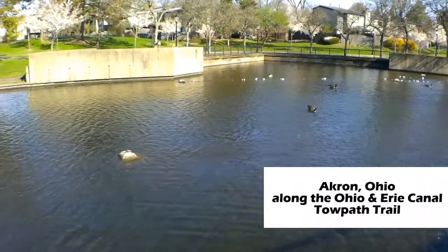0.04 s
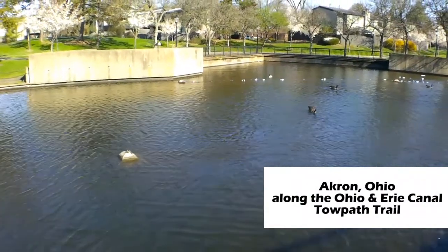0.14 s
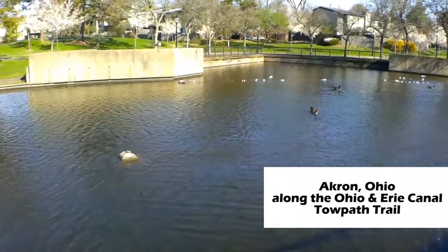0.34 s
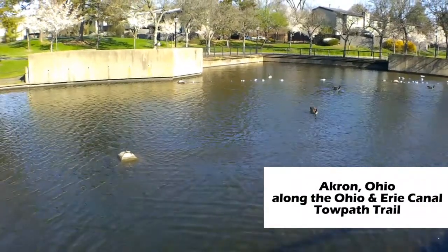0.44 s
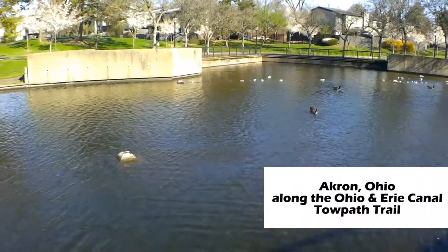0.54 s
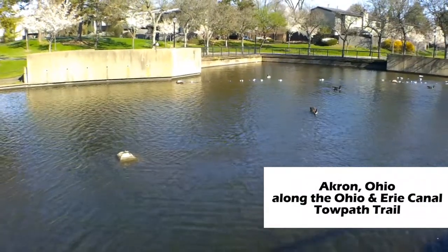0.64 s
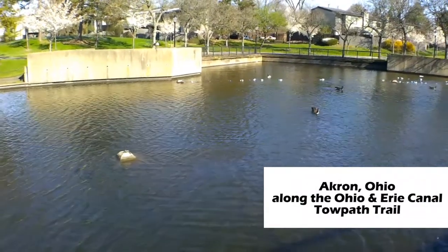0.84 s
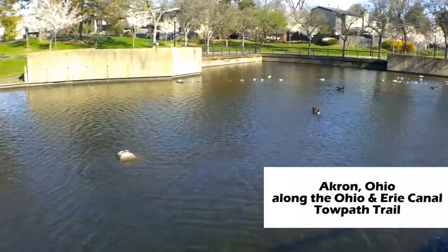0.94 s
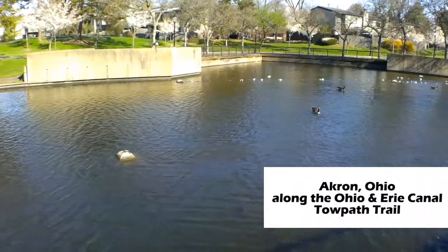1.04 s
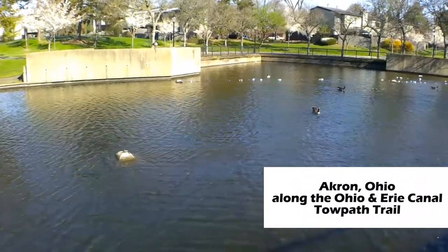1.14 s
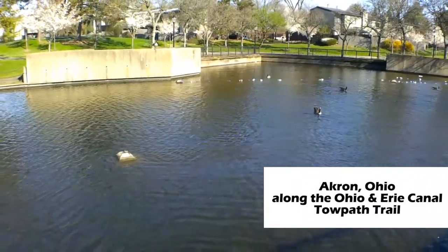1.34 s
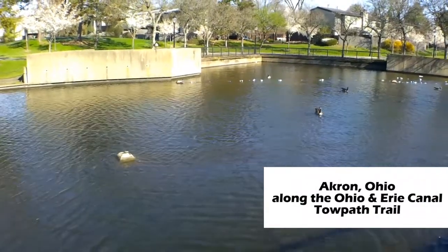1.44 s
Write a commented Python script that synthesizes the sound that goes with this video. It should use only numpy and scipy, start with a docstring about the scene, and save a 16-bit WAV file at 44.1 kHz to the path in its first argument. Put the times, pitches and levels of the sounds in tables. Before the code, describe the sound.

Two geese trade calls on a walled pond: short rising honks with a croaky start, and low rough grunts breaking into falling clucks. Walls echo them; a brief bird whistle and faint distant clamour sit behind.

```python
"""A walled pond with two geese calling: one honks on a clear rising note, the other grunts low and
breaks into a falling cluck. Both are sums of partials with moving pitch, level and roughness.
Walls return late echoes, banks and trees a diffuse tail (noise convolution). A far goose holds a thin
note (one partial), a songbird whistles (gliding sines); far clamour and wind (coloured noise) fill the gaps."""
import sys
import numpy as np
from scipy import signal
from scipy.fft import rfft, irfft, next_fast_len
from scipy.io import wavfile
from scipy.ndimage import uniform_filter1d, map_coordinates

SR = 44100
rng = np.random.default_rng(int(sys.argv[2]) if len(sys.argv) > 2 else 0)


def generate_wav(signal):
    """Clip the signal to [-1, 1] and save it as 16-bit WAV at the path in sys.argv[1]."""
    frames = np.transpose(np.atleast_2d(signal))
    scaled = np.clip(frames, -1, 1) * 32767
    pcm = np.round(scaled).astype(np.int16)
    wavfile.write(sys.argv[1], SR, pcm)


def magnitude_from_level(level_db):
    """Linear magnitude for a level in decibels (20 dB per decade)."""
    exponent = np.asarray(level_db, float) / 20
    return 10 ** exponent


N = 66150  # samples


def unit(x):
    """Scale to rms 1."""
    return x / np.sqrt(np.mean(x ** 2) + 1e-20)


def along(points, hz):
    """Interpolate (f/Hz, value) points on a log frequency axis."""
    f, v = np.transpose(points)
    return np.interp(np.log(hz + 1), np.log(f + 1), v)


def coloured(x, points):
    """Filter x by a (f/Hz, gain/dB) curve."""
    m = next_fast_len(len(x) + 8192)
    gain = magnitude_from_level(along(points, np.fft.rfftfreq(m, 1 / SR)))
    return irfft(rfft(x, m) * gain, m)[:len(x)]


def wobble(n, rate_hz):
    """Smooth random curve through rate_hz normal knots per second."""
    knots = rng.standard_normal(int(n * rate_hz / SR) + 4)
    return map_coordinates(knots, [np.arange(n) * rate_hz / SR])


# noise colours of clamour, hiss and wind rumble: [f/Hz, gain/dB]
CLAMOUR_COLOUR = [(88, -26), (150, -18), (499, -4), (559, -3.5), (723, -5), (782, -5.5), (856, -4),
                  (1110, -6), (1390, -4.5), (2200, -36), (2860, -76), (4840, -120)]
HISS_COLOUR = [(1060, -24), (1800, -3), (2220, -4.5), (3150, -11.5), (3540, -9.5), (4200, -12.5),
               (15600, -12.5)]
RUMBLE_COLOUR = [(12, -20), (20, 4.5), (41, -3.5), (81, -7), (124, -14), (200, -21), (260, -32),
                 (440, -120)]
# far clamour: [t/s, level/dB]
CLAMOUR_LEVEL = [(0, -45), (.15, -44), (0.301, -46), (.5, -42.5), (.7, -45.5), (.8, -43), (.83, -56),
                 (.9, -43.5), (1.15, -43.5), (1.25, -46), (1.4, -45.5), (1.5, -46)]


def background():
    """Far traffic and calls blurred to noise, hiss, and a wavering low rumble of wind."""
    clamour_db = np.interp(np.arange(N) / SR, *np.transpose(CLAMOUR_LEVEL))
    hiss_db = -57.5 + 0.59 * wobble(N, 4)
    rumble_db = -47 + 0.27 * wobble(N, 8.5)
    layers = [(CLAMOUR_COLOUR, clamour_db), (HISS_COLOUR, hiss_db), (RUMBLE_COLOUR, rumble_db)]
    return sum(magnitude_from_level(db) * unit(coloured(rng.standard_normal(N), colour)) for colour, db in layers)


# absorption of banks and walls: [f/Hz, gain/dB]
ECHO_COLOUR = [(300, 3), (450, -18), (850, -9), (1250, -3), (2000, -0.5), (3500, -0.5), (5000, -10.5),
               (9000, -5)]


def pond(x):
    """Diffuse tail off banks and trees: decaying noise with a soft onset."""
    t60_s, gain_db, onset_s = .35, -14, 0.017
    t = np.arange(SR) / SR
    tail = rng.standard_normal(SR) * magnitude_from_level(-60 * t / t60_s) * np.minimum(1, t / onset_s)
    wet = signal.fftconvolve(x, tail / np.linalg.norm(tail))[:N]
    return magnitude_from_level(gain_db) * coloured(wet, ECHO_COLOUR)


def echoes(x, walls):
    """Each wall returns one sharp copy with a short scattered tail."""
    scatter_db = -7  # tail re sharp copy
    t = np.arange(SR // 2) / SR
    path = np.zeros(len(t))
    for delay_s, db, smear_s in walls:
        decay = (t > delay_s) * np.exp(-np.maximum(t - delay_s, 0) / smear_s)
        tail = decay * rng.standard_normal(len(t))
        path += magnitude_from_level(db + scatter_db) * tail / np.linalg.norm(tail)
        path[round(delay_s * SR)] += magnitude_from_level(db)
    return coloured(signal.fftconvolve(x, path)[:N], ECHO_COLOUR)


# songbird glides: [start t/s, end t/s, start f/Hz, end f/Hz, peak level before trim and flutter/dB]
BIRD_NOTES = [(0.372, 0.383, 5320, 4840, -46.5), (0.384, 0.42, 4944, 4720, -38),
              (0.425, .431, 4550, 6480, -39.5), (0.428, 0.45, 6400, 6580, -50),
              (0.445, 0.466, 6900, 9000, -50), (0.468, 0.485, 5350, 4950, -36.5),
              (0.483, 0.496, 4960, 4930, -57), (0.499, 0.513, 4910, 4730, -39),
              (0.517, 0.518, 4500, 7000, -39), (0.52, 0.535, 6370, 6500, -51),
              (0.538, 0.555, 6600, 9100, -52.5), (0.554, 0.568, 4920, 4750, -42),
              (0.567, 0.594, 4730, 4810, -43.5), (.592, 0.612, 4720, 4640, -50),
              (0.603, .613, 6500, 9360, -50.5)]


def songbird():
    """Gliding whistles with fluttering level, doubled by a near reflection."""
    edge_s, trim_db, flutter_db = .002, -0.5, 1.5
    reflection_s, reflection_db = .0035, -9
    t, out = np.arange(N) / SR, np.zeros(N)
    for start, end, from_hz, to_hz, db in BIRD_NOTES:
        glide_hz = np.interp(t, [start, end], [from_hz, to_hz])
        gate = np.clip(np.minimum(t - start, end - t) / edge_s + .5, 0, 1)
        level = magnitude_from_level(db + trim_db + flutter_db * wobble(N, 121.2))
        out += level * gate * np.sin(2 * np.pi * np.cumsum(glide_hz) / SR)
    return out + magnitude_from_level(reflection_db) * np.roll(out, round(reflection_s * SR))


DRIFT_DB, DRIFT_RATE_HZ, DRIFT_FROM_HZ = 2.5, 35, 2300  # treble partials swell and sink one by one
MOST_SHAKE = .9  # cap on shake depth: the treble keeps its pulses


def voice(rows, partials, rough, count, gate=0):
    """One call as a sum of shaken partials; partials(k, Hz, time, columns) gives their rms dB."""
    s, *cols = np.transpose(rows)
    i = np.arange(max(round(s[0] * SR), 0), min(round(s[-1] * SR), N))
    pitch_hz, *rest = [np.interp(i / SR, s, c) for c in cols]
    k = np.arange(1, count + 1)[:, None]
    hz = k * pitch_hz
    treble = hz > DRIFT_FROM_HZ

    jitter = np.min(rough) * 0.039 * wobble(len(i), 141.7)
    phase = 2 * np.pi * np.cumsum(pitch_hz * (1 + jitter)) / SR

    level = magnitude_from_level(partials(k, hz, i / SR - s[0], *rest)) * (hz < 15000)
    drift = np.array([wobble(len(i), DRIFT_RATE_HZ) for _ in k])
    level = level * magnitude_from_level(DRIFT_DB * treble * drift)
    burst = np.exp(gate * np.cos(phase)) / np.sqrt(np.i0(2 * gate))  # rms 1 over a pulse
    level = level * np.where(treble, burst, 1)

    # random size and phase slip of each partial, deeper with frequency
    knots = rng.standard_normal((2, count, len(i) // 96 + 2))[:, :, np.arange(len(i)) // 96]
    depth = np.minimum(rough * (hz / 1000) ** 1.4, MOST_SHAKE)
    size, slip = depth * uniform_filter1d(knots, size=96, axis=2)
    level = level * (1 + size) / np.sqrt(1 + depth ** 2)
    tone = np.sum(level * np.sin(k * phase - 0.0046 * k * k + slip), axis=0)

    # 3.5 ms fades, none where the call meets either end of the scene
    fade_in = i - i[0] + (i[0] == 0) * SR
    fade_out = i[-1] - i + (i[-1] == N - 1) * SR
    edge = np.minimum(1, np.minimum(fade_in, fade_out) / (0.0035 * SR))
    out = np.zeros(N)
    out[i] = np.sqrt(2) * tone * edge
    return out


FAR_ROUGH = .2  # shake at 1 kHz, far goose and fading honk
# far goose, one list a note: [t/s, f/Hz, level/dB]
FAR_NOTES = [
    [(0.3, 1389, -64), (0.314, 1413, -65), (0.32, 1387, -58), (0.346, 1300, -60), (0.38, 1291, -68)],
    [(0.69, 1357, -31), (0.718, 1286, -53), (0.752, 1386, -39), (0.798, 1331, -36), (0.82, 1329, -68)],
    [(1.37, 1343, -53), (1.418, 1359, -62), (1.43, 1287, -82), (1.454, 1373, -65), (1.48, 1338, -31)],
]


def far_goose():
    """One wavering partial is all that carries from across the water."""
    def partials(k, hz, t, db):
        return db + 0 * hz
    return sum(voice(rows, partials, FAR_ROUGH, count=1) for rows in FAR_NOTES)


# echoes of a honk just gone: [t/s, pitch f/Hz, 2nd partial level/dB, 3rd partial level/dB, treble re 2nd/dB]
FADING_HONK = [(0.0, 420, -46.5, -26.5, -5), (0.01, 402, -36.5, -36.5, -25),
               (0.042, 412.5, -38, -36, -19.5), (0.064, 404, -47, -37.5, -17),
               (0.074, 403.7, -51.5, -49, -15.5), (0.108, 410.8, -42, -46, -23.5),
               (0.138, 400.6, -55, -56, -24), (0.16, 413, -43, -35.5, -29)]


def fading_honk():
    """Remains of a honk just gone: weak, rough honk partials with the croak suppressed."""
    return honk(FADING_HONK, -120, FAR_ROUGH)


# partials 1-14 before and after the break: [level re call/dB]; the 4th follows its own column instead
GRUNT = [-33.5, -65, -27.5, 0, -21.5, -17, -10, 0, -59, -14.5, -24, -37.5, -48, -31]
BREAK = [-80, -31.5, -17.5, 0, -62, -63, 4.5, 1, -60, -18, -20.5, -14.5, -45, -23.5]
# partials above the 14th: [f/Hz, level re call/dB]
CLUCK_TREBLE = [(2400, -39), (2800, -46), (3500, -34.5), (4200, -38.5), (4800, -44), (5500, -38.5),
                (6300, -45), (7200, -55.5), (8000, -52), (8800, -53), (9800, -63.5), (11000, -53),
                (12500, -74)]
BREAK_FROM_DB, BREAK_SPAN_DB = -13, 12.5  # 4th partial re call at break onset; rise to full break
EVERY_FOURTH_DB, GRUNT_DULL_DB = 15.5, -20.5  # treble: boost of every 4th partial; cut before the break
CLUCK_ROUGH, FOURTHS_STEADY = .15, .5  # shake at 1 kHz; its factor for every 4th partial
CLUCK_GATE = 1.3  # treble comes in one burst a pulse


def cluck(rows):
    """Slow pulses; at the break the 4th and 7th partials and the treble jump up."""
    def partials(k, hz, t, level, fourth, treble):
        broke = np.clip((fourth - level - BREAK_FROM_DB) / BREAK_SPAN_DB, 0, 1)
        row = np.minimum(k, len(GRUNT)) - 1
        low = np.array(GRUNT)[row] * (1 - broke) + np.array(BREAK)[row] * broke
        high = treble + along(CLUCK_TREBLE, hz)
        high = high + EVERY_FOURTH_DB * (k % 4 == 0) + GRUNT_DULL_DB * (1 - broke)
        return np.where(k == 4, fourth, level + np.where(k <= len(GRUNT), low, high))
    k = np.arange(1, 73)[:, None]
    rough = CLUCK_ROUGH * np.where(k % 4, 1, FOURTHS_STEADY)
    return voice(rows, partials, rough, count=72, gate=CLUCK_GATE)


# clucks, one list a call: [t/s, pulse rate f/Hz, level/dB, 4th partial level/dB, treble trim/dB]
CLUCKS = [
    [(0.14, 148, -68, -46, -8), (0.148, 143.9, -60, -61, -7), (0.162, 150.8, -39.5, -54, -3),
     (0.19, 149.8, -29.5, -44, 8), (0.194, 148.9, -30, -41, -3), (0.204, 175.8, -31.5, -30.5, -12),
     (0.214, 163.1, -24.5, -27.5, -1), (0.236, 156.8, -30.5, -37, -6), (0.255, 155, -50, -48, 7)],
    [(0.585, 155.6, -36, -27.5, 3), (0.599, 149.1, -33, -65, 12), (0.621, 152, -23.5, -43.5, -3),
     (0.631, 172.4, -32, -25.5, 0), (0.639, 173.1, -25, -28.5, 5), (0.663, 165.6, -28, -33, -5),
     (0.685, 159, -50.5, -39, 0)],
    [(1.255, 155, -46, -41, -18), (1.301, 155.3, -25, -54, 3), (1.307, 152.5, -21.5, -34.5, -5),
     (1.315, 172.4, -34, -37, -6), (1.323, 170.9, -25, -26.5, 1.5), (1.345, 161.2, -33, -31.5, -8),
     (1.362, 161, -29, -38.5, 0)],
]
# double cluck overlapping the second honk, same columns
DOUBLE_CLUCK = [
    [(.9, 158.2, -50, -46, -3), (.92, 162.5, -25.5, -75, -6), (.928, 157.5, -15, -24, 11.5),
     (.938, 154.3, -15.5, -28.5, 10), (.948, 147.8, -21, -28, 12), (.955, 148, -13.5, -32.5, -10),
     (.962, 148, -30, -46, 3)],
    [(.95, 173.3, -69, -65, 3), (.96, 176, -25.5, -26, -2), (.968, 164.2, -28, -28.5, -0.5),
     (.98, 165, -30, -30.5, -6), (.99, 157.6, -20.5, -44, -11), (1.005, 154.2, -28, -37, -5),
     (1.03, 140.7, -35.5, -79, -6), (1.04, 138, -17, -72, 1)],
]


def second_goose():
    """Grunts that break into falling clucks, by slow pulses rich in partials."""
    return sum(cluck(rows) for rows in [*CLUCKS, *DOUBLE_CLUCK])


# throat colour of the 4th and 5th partials: [f/Hz, level re 2nd/dB]
HONK_MIDDLE = [(1640, -17.5), (1710, -20), (1860, -26), (2100, -22), (2200, -29.5), (2330, -39)]
# honk partials above the 5th: [f/Hz, gain/dB]
HONK_TREBLE = [(2350, -0.5), (2750, -8.5), (2950, 1), (3400, -1), (3700, 1.5), (4000, -19), (4300, -1.5),
               (4900, -12.5), (5600, -3.5), (6500, -13.5), (7200, -11.5), (8000, -19), (8900, -19),
               (9800, -24), (11000, -19), (12000, -46)]
# half-pitch croak: [f/Hz, gain/dB]
CROAK_COLOUR = [(200, -29), (600, 0.5), (1100, 2), (1500, -2), (2500, -53), (5800, -39), (9000, -62)]
HONK_ROOT_DB = -6  # lowest partial re 2nd
CROAK_SIGMA_S = 0.0061  # sigma of the croak's Gaussian power decay


def honk(rows, croak_db, rough):
    """Partials on half the pitch: the even ones carry the note, the odd ones croak at the start."""
    def partials(k, hz, t, second, third, treble):
        note = np.select([k == 2, k == 4, k == 6, k <= 10],
                         [second + HONK_ROOT_DB, second, third, second + along(HONK_MIDDLE, hz)],
                         second + treble + along(HONK_TREBLE, hz))
        decay_db = 20 * np.log10(np.e) * (t / CROAK_SIGMA_S / 2) ** 2
        croak = croak_db - decay_db + along(CROAK_COLOUR, hz)
        return np.where(k % 2, croak, note)
    half_pitch = [(s, hz / 2, *c) for s, hz, *c in rows]
    return voice(half_pitch, partials, rough, count=64)


# honks, one list a call: [t/s, pitch f/Hz, 2nd partial level/dB, 3rd partial level/dB, treble re 2nd/dB]
HONKS = [
    [(.38, 403, -73, -58, -26), (.386, 399, -56, -38, -26), (.389, 395, -40, -30, -25),
     (.398, 414.3, -26, -25.5, -25.5), (.428, 416.9, -24.5, -38, -27.5), (.44, 422.6, -23.5, -24, -25.5),
     (.448, 429.9, -22, -19.5, -23), (.458, 422.7, -25.5, -17, -27), (.47, 423, -27, -25, -25),
     (.485, 433.6, -32, -28.5, -39), (.5, 438, -40, -38.5, -16)],
    [(.832, 420, -52, -55, -22), (.838, 412.2, -56, -29, -12), (.841, 414.2, -35, -29, -13.5),
     (.854, 413.7, -23.5, -25, -29), (.88, 424.2, -22.5, -74, -28.5), (.895, 428.7, -20.5, -25, -24.5),
     (.903, 444.8, -20, -24.5, -23), (.912, 463, -18, -23, -23.5), (.928, 468, -20.5, -38, -31.5),
     (.936, 465, -23, -19.5, -14.5), (.945, 440, -64, -62, -6)],
    [(1.478, 396, -70.5, -60, -33), (1.486, 398, -43, -38.5, -11), (1.5, 419, -22, -30, -24.5)],
]
# croak opening each honk: [level before colour/dB]
CROAKS_DB = [-33.5, -30.5, -32.5]


def first_goose():
    """Clear rising honks, each opened by a half-pitch croak; shake .045 at 1 kHz."""
    return sum(honk(rows, db, .045) for rows, db in zip(HONKS, CROAKS_DB))


# wall echoes of honks and clucks: [delay t/s, level before colour/dB, smear time constant t/s]
HONK_ECHOES = [(.064, -6.5, 0.0102), (.087, -13.5, 0.024), (.122, -8, 0.024), (.19, -12, .015)]
CLUCK_ECHOES = [(.065, -21, .008), (.128, -18.5, .008), (.19, -24, .015)]


def scene():
    """Both geese with their echoes, far goose, bird and background."""
    first, second, gone = first_goose(), second_goose(), fading_honk()
    geese = first + second + gone
    wet = echoes(first, HONK_ECHOES) + echoes(second, CLUCK_ECHOES) + pond(geese)
    return (geese + wet + far_goose() + songbird() + background())[None]


def band_limit(x):
    """A steep low-pass at the top of the band."""
    return signal.sosfilt(signal.butter(12, 15700, fs=SR, output="sos"), x)


def record(dry):
    """Band limit: steep low-pass, -60 dB within 150 Hz above top_hz."""
    top_hz = 15750
    mix = coloured(dry[0], [(top_hz, 0), (top_hz + 150, -60)])[None]
    return band_limit(mix)


dry = scene()
out = record(dry)
generate_wav(out)
```